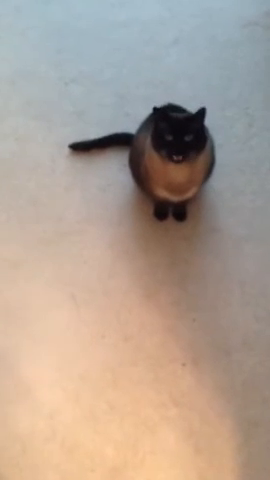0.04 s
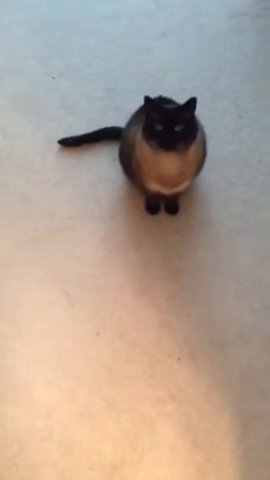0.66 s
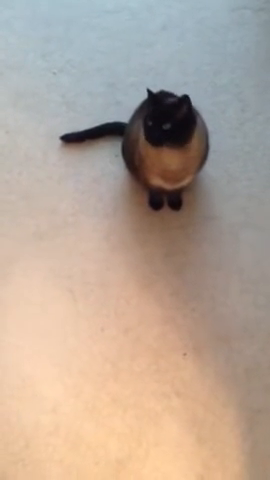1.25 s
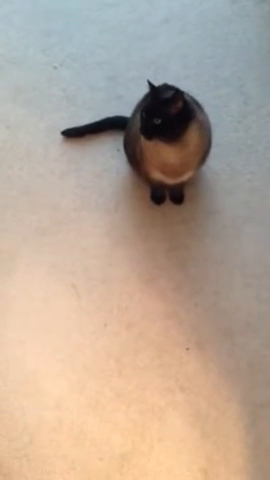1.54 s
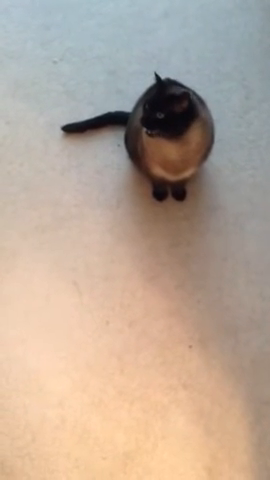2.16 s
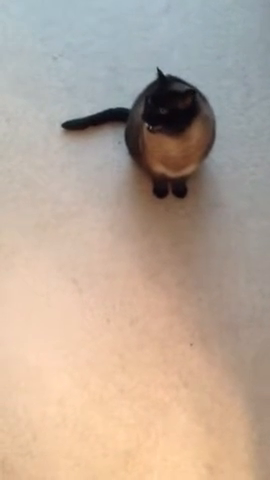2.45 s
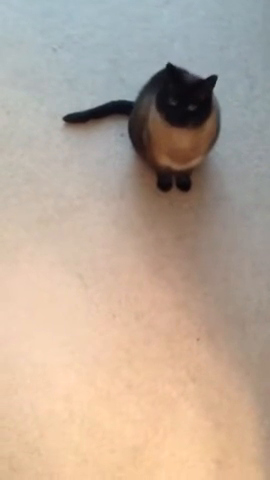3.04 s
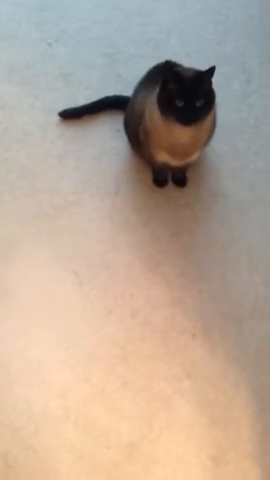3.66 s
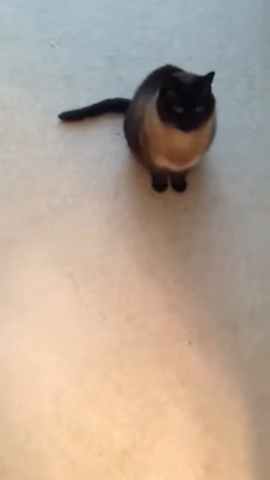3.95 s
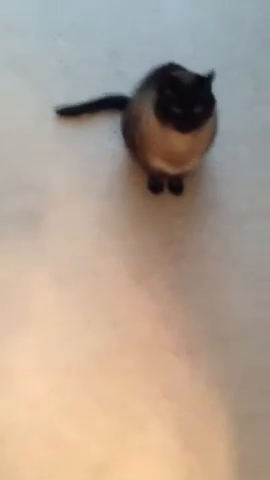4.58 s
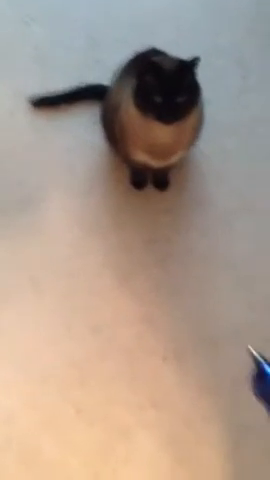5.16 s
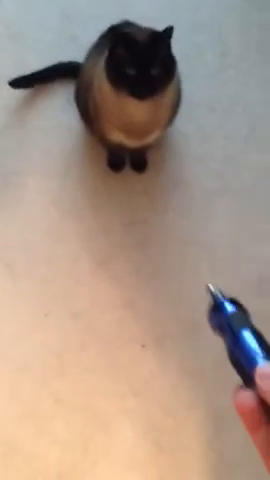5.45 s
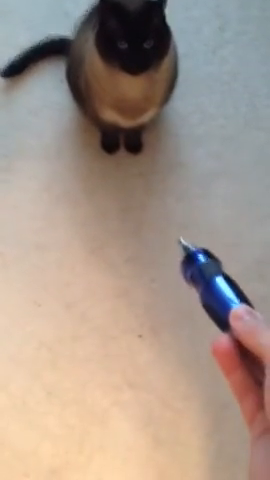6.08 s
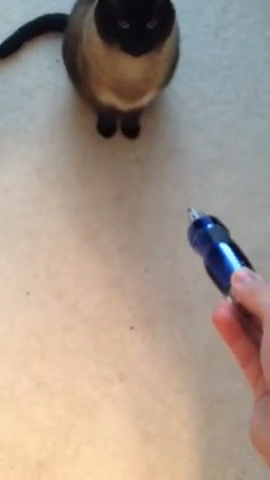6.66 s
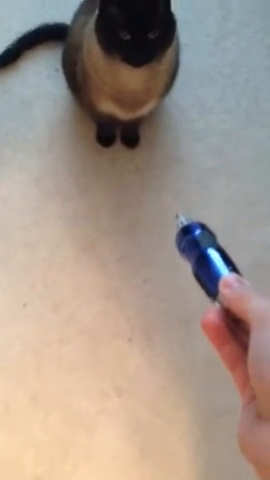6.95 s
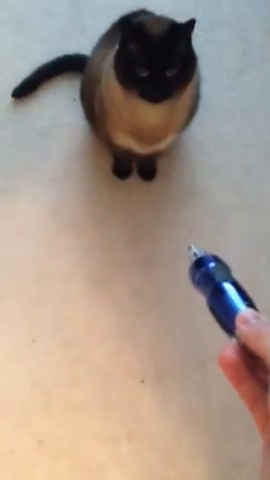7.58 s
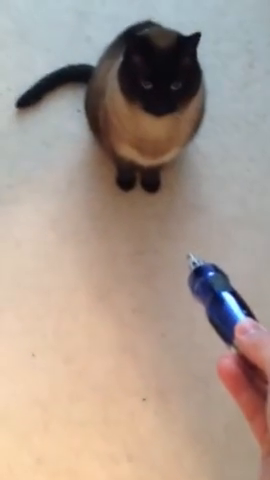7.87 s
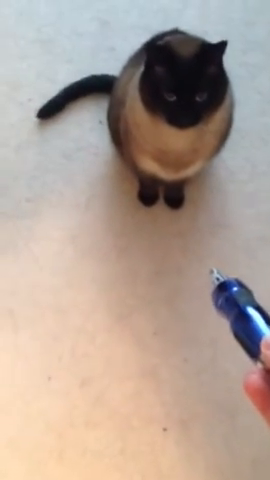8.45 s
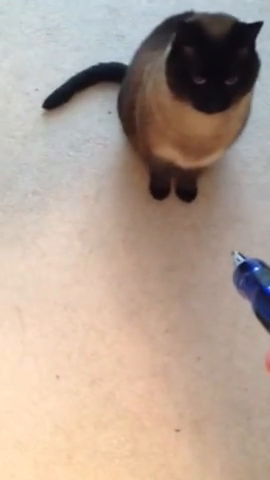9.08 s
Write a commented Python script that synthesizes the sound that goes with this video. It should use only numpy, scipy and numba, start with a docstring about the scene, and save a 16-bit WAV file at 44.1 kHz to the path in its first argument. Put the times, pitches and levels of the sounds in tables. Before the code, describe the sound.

The place is a quiet, carpeted room with very little echo and only a faint background rumble. Right at the start a cat meows for about a second: the call begins with a rasp, rises, clears and then sinks in pitch. After a short pause, a second meow runs from about 2.1 to 3.1 seconds, with a slight tremble and a falling end. At about 3.1 seconds a switch clicks and a small battery trimmer spins up quickly, closer and louder than the cat. It makes a high, hissing buzz with a fine, fast rattle and a thin motor whine, and almost no bass. A few faint, sharp taps come between 3.3 and 4.4 seconds. Its tone shifts as it is turned toward the microphone until about 5.6 seconds. The rattle then eases and it whirs steadily to the end, a little after 9 seconds.

```python
"""A quiet, carpeted room. A cat meows twice, its vocal folds the source and its mouth the filter: each
call starts with a rasp, clears, and sinks as the mouth closes. Then a small battery trimmer clicks on,
spins up and is brought round in front of the microphone. Its shaft scrapes and knocks alike on every
turn, a periodic force that rings the resonances of the plastic shell over the whine of the motor.
Faint rumble, hiss and mains hum lie beneath."""
import sys
import numpy as np
from scipy import signal
from scipy.fft import rfft, irfft, next_fast_len
from scipy.io import wavfile
from scipy.ndimage import uniform_filter1d, map_coordinates
from numba import njit

SR = 44100
rng = np.random.default_rng(int(sys.argv[2]) if len(sys.argv) > 2 else 0)


def digitize_waveform(pressure):
    """Quantize a signal to 16-bit integers and store it at the path in sys.argv[1].

    Rows of a 2-D input are taken as channels; values are limited to [-1, 1].
    """
    field = np.atleast_2d(pressure).T
    bounded = np.clip(field, -1, 1)
    quanta = np.round(bounded * 32767).astype(np.int16)
    wavfile.write(sys.argv[1], SR, quanta)


N = 411012
TIME = np.arange(N) / SR

# the cat's voice, one table a call: time_s, pitch_hz, mouth_resonance_hz
CALL_CONTOURS = [
    [(.09, 477, 846), (.135, 556, 1780), (.17, 572, 2020), (.195, 597, 2050), (.21, 706, 2090),
     (.23, 743, 2200), (.255, 781, 2080), (.34, 740.3, 1720), (.41, 718, 2040), (.46, 725.5, 2170),
     (.6, 676.5, 1370), (.672, 663, 1340), (.8, 624, 1300), (.92, 581, 1330), (1.02, 569.6, 1423),
     (1.084, 523, 1290), (1.125, 490, 1168), (1.21, 437, 1300)],
    [(2.09, 398, 820), (2.15, 415, 899), (2.21, 455, 987), (2.265, 526, 1630), (2.295, 694, 1640),
     (2.4, 689, 1830), (2.454, 676.5, 1950), (2.52, 652, 1856), (2.58, 613, 1330), (2.655, 647, 1265),
     (2.7, 636, 1255), (2.8, 611, 1320), (2.9, 568, 1225), (2.97, 537, 1087), (3.012, 460, 950),
     (3.09, 436, 810)],
]
# vocal effort, one table a call: time_s, level_db
CALL_EFFORT = [
    [(.09, -60.5), (.165, -49.5), (.22, -54), (.3, -54.5), (.35, -51.5), (.45, -48), (.54, -42.5),
     (.63, -52.5), (.78, -65.5), (1.1, -62.5), (1.15, -70.5), (1.22, -85)],
    [(2.09, -76), (2.2, -55), (2.27, -55), (2.34, -57), (2.44, -49), (2.55, -53), (2.68, -59),
     (2.87, -64.5), (3.03, -57), (3.08, -65)],
]
# two bands relative to the effort: time_into_call_s, fundamental_db, mid_resonance_db
CALL_BALANCE = [(0, -1, -17), (.09, -6.5, -4.5), (.14, -0.5, -9), (.24, -3.5, -42), (.37, -6, -23),
                (0.521, -3, -6), (.7, 4, -7), (.85, 7, -20), (0.969, 0.5, -22)]
# level of the voice's treble, one table a call: time_s, throat_db, edge_db
CALL_TREBLE = [
    [(0.1, -87, -88), (0.106, -65, -76), (0.154, -55.5, -77), (0.33, -82, -79), (0.498, -64, -56),
     (0.55, -80, -58), (0.566, -56, -52.5), (0.692, -75, -78), (0.85, -88, -87)],
    [(2.12, -91, -82), (2.174, -60.5, -69), (2.38, -61.5, -68), (2.474, -76, -64), (2.488, -83, -63),
     (2.57, -75, -72), (2.61, -80, -70), (2.78, -90, -75), (2.85, -90, -92)],
]
# upper resonances of the throat: centre_hz, width_hz, gain_db
THROAT_FORMANTS = [(3370, 600, 6), (3900, 1500, 0)]
# a thin treble edge that climbs as the mouth closes: time_s, centre_hz
EDGE_FORMANT = [(.1, 4670), (.35, 5050), (.44, 5680), (.55, 5640), (.7, 6200), (2.1, 5130), (2.35, 5525),
                (2.48, 5560), (2.56, 6300), (2.68, 6350), (2.76, 6680)]
# irregular vibration of the folds: start_s, end_s, roughness_fraction
RASPS = [(.07, .14, .6), (.14, .2, .33), (.2, .26, .22), (.268, .335, .85), (1.13, 1.22, 1),
         (2.07, 2.16, .5), (2.17, 2.255, .36), (2.27, 2.29, .6), (2.3, 2.37, .08), (2.45, 2.55, .07)]
# strong and weak cycles alternate after a rasp: start_s, end_s, depth_fraction
PERIOD_DOUBLINGS = [(.33, .41, .4), (2.29, 2.37, .2)]
# a harmonic crosses a null of the room: time_s, half_length_s, harmonic_number
ROOM_NULLS = [(.165, .03, 1), (.29, .022, 1), (.51, .008, 2), (.578, .006, 1), (.622, .008, 2),
              (.727, .006, 2), (.785, .012, 1), (.868, .014, 1), (1.09, .06, 1), (2.24, .035, 1),
              (2.59, .02, 1), (2.757, .012, 1), (2.817, .007, 1), (2.97, .085, 1)]
# a harmonic crosses a resonance: time_s, half_length_s, harmonic_number, level_over_effort_db
ROOM_PEAKS = [(0.177, 0.021, 4, 4.5), (0.216, 0.0061, 3, 12), (0.24, .009, 3, 10.5), (0.6, 0.012, 2, -5),
              (0.669, 0.01, 2, 11), (.7, 0.0081, 2, 7), (1.095, 0.0068, 2, 9.5), (2.23, 0.026, 2, 2),
              (2.267, .014, 3, 7.5), (2.349, 0.046, 5, -10), (2.476, 0.0094, 4, 2), (2.583, 0.028, 2, 16.5),
              (2.745, .03, 4, -5), (0.22, 0.014, 4, 1)]

# the motor's speed once spun up: time_s, turn_rate_hz
RUNNING_SPEED = [(3.8, 104.8), (4.21, 106.1), (4.29, 105.6), (4.44, 106.5), (4.5, 106.1), (4.78, 106.2),
                 (6.4, 106.4), (6.91, 105), (7.91, 106), (8.43, 104.7), (8.47, 105.6), (9.3, 105.2)]
# two stages of spin-up: initial_shortfall_hz, time_constant_s
SPIN_UP = [(26.05, .045), (15.547, .2)]
# the trimmer's loudness contour: time_s, level_db, relative_drone_db
TRIMMER_LEVEL = [(3.2, -40.5, -12), (3.5, -38.5, -17), (4.03, -41, -16.5), (4.32, -37.5, -16.5),
                 (4.44, -40, -15.5), (4.86, -41, -19), (6.24, -41.5, -17.5), (9.3, -41.5, -18)]
# how it is held: time_s, facing_fraction (0 from behind, 1 from the front), knock_over_hiss_db
GRIP = [(3.13, 0, -5.5), (3.45, 0.11, -7.5), (3.72, 0.47, -3.5), (4.32, 0.3, -4), (4.55, 0.42, -10.5),
        (4.7, 0.55, -6), (5.15, 0.76, -5.5), (5.6, 1, -5), (6.6, 0.98, -14), (9.3, 1, -15)]
# friction spectrum of the contacts: frequency_hz, gain_db
HISS_SPECTRUM = [(2500, -34.5), (4100, -13.5), (5200, -13), (6300, -5.5), (7500, -4), (9300, -1.5),
                 (11500, -1.5), (12700, -4), (13800, -6.5), (15300, -13.5)]
# high resonances of the shell: centre_hz, width_hz, behind_db, side_db, slant_db, front_db
SHELL_MODES = [(4380, 200, -15, -9, -12, -4.5), (4877, 310, -20, 1.5, -17, -12),
               (5550, 170, -14, 0.5, -3, -11.5), (5852, 190, -13, -14, -5.5, -4.5),
               (6130, 200, 0, -22, -20, -25), (7070, 530, 3.5, 3, 2, -23), (7750, 220, 11, 11.5, 3.5, -1.5),
               (8330, 350, -4, 1, 4, 0.5), (8930, 350, 6.5, -26, -43, -26), (12080, 360, -16, 4.5, 5, 0.5)]
# the band of hiss that a reflection cancels: time_s, centre_hz, depth_fraction
HISS_NOTCH = [(3.5, 10100, .05), (3.7, 9900, 0.7), (4.15, 9900, 0), (4.42, 9050, 0.3), (4.75, 10690, 0.9),
              (5.1, 10300, 0.2), (5.4, 10150, 0), (7.2, 9996, 0.27), (9.3, 10290, 0.2)]
# resonances rung by a knock: centre_hz, width_hz, gain_db
KNOCK_MODES = [(4820, 180, -2), (5614, 520, 0), (7540, 1560, 4)]
# broad vibration of the body: frequency_hz, gain_db
DRONE_SPECTRUM = [(500, -2), (1000, 2.5), (1250, -4.5), (1600, -1), (3900, -20), (5000, -57)]
# low resonances of the body: centre_hz, width_hz, behind_db, side_db, slant_db, front_db
BODY_MODES = [(1640, 200, 9.5, 0, -1, 5.8), (1970, 320, 6, -21, -0.5, 1.3), (2536, 290, 5, -1.5, 4.5, 5.9),
              (3140, 400, 0, -22, 3, 5.47), (3380, 186, 6, 3, -15, 3.96), (3760, 190, 4, 0, 2, 4.5)]
# motor tones on multiples of the turn rate: harmonic_number, level_db, waver_db
MOTOR_HARMONICS = [(6, -90, 1), (7, -86, 1), (8, -85, 1.5), (9, -72.5, 1), (10, -77.5, 1.5), (11, -85, 1.5),
                   (12, -85, 2), (18, -78, 2), (19, -78, 2), (20, -79, 2), (41, -69.5, 1), (42, -73, 1.5),
                   (43, -72, 1), (52, -71, 1.5), (53, -71, 1.5), (54, -67, 1.5)]
# gain of those tones as the trimmer is brought round: time_s, gain_db
WHINE_GAIN = [(3.2, -10), (3.7, -5), (4.1, 0), (5, 1.5), (6, 0), (9.3, -.5)]
# tones that the grip puts on a resonance: start_s, end_s, harmonic_number, level_db
RESONANT_TONES = [(3.22, 4.0, 18, -65), (3.7, 4.66, 46, -62.5), (3.9, 4.55, 16, -71), (4.15, 4.65, 73, -57),
                  (4.5, 4.62, 15, -59), (4.65, 5.55, 52, -62), (4.7, 5.3, 66, -59), (4.7, 5.4, 74, -60),
                  (5.3, 6.45, 16, -69), (7.1, 8.25, 16, -66), (7.55, 8.27, 18, -69)]
# harder blows of the tip: time_s, level_db, decay_s
TIP_TAPS = [(3.495, -40, 0.0046), (3.934, -37, 0.028), (4.242, -41, .005), (4.384, -44, .004),
            (3.287, -45, .002), (3.367, -42, 0.0018)]
# the snap of the switch: time_s, level_db
SWITCH_SNAPS = [(3.126, -39.5)]
# modes rung by the snap: frequency_hz, gain_db, t60_s
SWITCH_MODES = [(1970, -6, .04), (3070, 7.5, 0.016), (3420, 4, 0.02), (4100, -11, 0.034), (7300, -4, 0.025)]

# spectrum of the quiet room: frequency_hz, relative_density_db
AMBIENT_SPECTRUM = [(15, -42), (25, -22), (54, -1), (69, -2.5), (90, -6.5), (142, -9), (278, -12.5),
                    (475, -16), (604, -18.5), (709, -17.5), (1180, -23), (4040, -20), (15000, -22.5)]


def cat():
    """Source and filter: the tone of the folds passes the formants of mouth and throat into the room."""
    pitch_hz, mouth_hz = curves(np.vstack(CALL_CONTOURS))
    effort_db, = curves(np.vstack(CALL_EFFORT))
    rough = roughness()
    jitter = 1 + .0045 * walk(70) + .04 * rough * walk(300)
    phase = 2 * np.pi * np.cumsum(pitch_hz * jitter) / SR
    folds = vocal_folds(phase, rough)
    calling = sum(gate(call[0][0], call[-1][0], fade_s=.028) for call in CALL_EFFORT)
    loudness = undb(effort_db) * calling
    voice = loudness * mouth(folds, pitch_hz, mouth_hz, rough) + calling * throat(folds)
    heard = room(voice + throat_catch(), wet_db=-7, t60_s=.16)
    return standing_waves(heard, pitch_hz, phase, loudness)


def vocal_folds(phase, rough):
    """Self-sustained oscillation gives harmonics; rough folds add period doubling and turbulence."""
    harmonics = unit(sum(undb(2.8 * walk(45)) * np.cos(k * phase + k * k) for k in range(1, 14)))
    after_rasp = sum(depth * gate(start, end, fade_s=.02) for start, end, depth in PERIOD_DOUBLINGS)
    doubling = .9 * rough + after_rasp
    flutter = 1 + doubling * np.cos(phase / 2) + .45 * rough * walk(450)
    turbulence = (.035 + .45 * rough) * noise()
    return even(flutter * (harmonics + turbulence), samples=300)


def roughness(onset_s=.005, clearing_s=.022):
    """Chaotic vibration, 0 to 1: the voice breaks quickly and clears more slowly."""
    breaks = [
        rough * np.exp(np.minimum(TIME - start, 0) / onset_s - np.maximum(TIME - end, 0) / clearing_s)
        for start, end, rough in RASPS]
    return np.clip(.02 + np.max(breaks, axis=0), 0, 1)


def mouth(folds, pitch_hz, mouth_hz, rough, rasp_band_hz=820):
    """Cavity resonance: the closing mouth rings lower and more sharply, and a rasp blurs the peak."""
    fundamental_db, mid_db = call_balance()
    vowel = formant(folds, mouth_hz, width_hz=430 * (mouth_hz / 1300) ** 2 + 400 * rough)
    vowel = even(vowel + undb(.5) * formant(folds, hz=1115, width_hz=147))
    mid = np.sqrt(13) * formant(folds, hz=2530, width_hz=210)
    # in a rasp the fundamental gives way to a low band of its own
    low_hz = pitch_hz + (rasp_band_hz - pitch_hz) * np.minimum(2 * rough, 1)
    fundamental = even(formant(folds, low_hz, width_hz=180)) * undb(1.7 * walk(40))
    quaver = undb(2.2 * walk(75))
    voice = tremble() * (quaver * vowel + undb(mid_db) * mid) + undb(fundamental_db) * fundamental
    # a small mouth loses the fundamental when the pitch sinks
    return highpass(voice, hz=600, order=6)


def call_balance():
    """Spectral balance: the fundamental and mid resonance follow the same course in each call."""
    began_s = np.full(N, CALL_EFFORT[0][0][0])
    for call in CALL_EFFORT[1:]:
        began_s = np.where(TIME >= call[0][0], call[0][0], began_s)
    return curves(CALL_BALANCE, TIME - began_s)


def tremble(rate_hz=40, depth=.55):
    """Amplitude modulation: the throat flutters in the second call as the mouth starts to close."""
    beat = np.sin(2 * np.pi * np.cumsum(rate_hz * (1 + .25 * walk(30))) / SR)
    return 1 + depth * beat * gate(2.44, 2.84, fade_s=.041)


def throat(folds):
    """Upper formants: stationary throat resonances and a thin, climbing edge supply the treble."""
    throat_db, edge_db = curves(np.vstack(CALL_TREBLE))
    edge_hz, = curves(EDGE_FORMANT)
    ring = even(sum(undb(db) * formant(folds, hz, width) for hz, width, db in THROAT_FORMANTS))
    edge = even(formant(folds, edge_hz, width_hz=1100))
    return undb(throat_db - 4) * ring + undb(edge_db - 3) * edge


def throat_catch(at_s=2.414, half_length_s=.007):
    """A noise transient: the throat catches briefly in the second call."""
    crackle = unit(formant(noise(), hz=2170, width_hz=1600))
    return undb(-55) * crackle * np.exp(-((TIME - at_s) / half_length_s) ** 2)


def standing_waves(voice, pitch_hz, phase, loudness):
    """Interference: gliding harmonics drop out at the room's nulls and swell at its resonances."""
    def bump(at_s, half_s):
        return np.exp(-np.abs((TIME - at_s) / half_s) ** 3)

    for k in (1, 2):
        dip = np.minimum(sum(bump(s, half) for s, half, harmonic in ROOM_NULLS if harmonic == k), 1)
        voice = voice - .9 * dip * resonate(voice, k * pitch_hz, width_hz=np.full(N, 300.))
    swells = sum(undb(db) * bump(s, half) * np.sqrt(2) * np.cos(round(k) * phase)
                 for s, half, k, db in ROOM_PEAKS)
    return voice + loudness * swells


def trimmer():
    """Forced vibration: a turning shaft drives hiss, knock, drone and whine at its own period."""
    running_s = np.maximum(TIME - MOTOR_ON_S, 0)
    full_hz, = curves(RUNNING_SPEED)
    turn_hz = full_hz - sum(shortfall * np.exp(-running_s / lag) for shortfall, lag in SPIN_UP)
    level_db, drone_db = curves(TRIMMER_LEVEL)
    facing, knock_db = curves(GRIP)
    turns = np.cumsum(turn_hz * (1 + .001 * walk(25) + .0012 * walk(4))) / SR
    # play in the bearing shifts each contact a little, which blurs the highest multiples into hiss
    loose_turns = turns + .0013 * walk(200)
    # one strong contact a turn, and a lighter one half a turn later
    pulses = pulse_train(loose_turns, width_turns=.085, scatter_db=2.3)
    pulses += .35 * pulse_train(loose_turns + .5, width_turns=.07, scatter_db=4)
    hiss = contact_hiss(loose_turns, pulses, facing)
    contacts = even(hiss + undb(knock_db) * shaft_knock(loose_turns), samples=4000)
    drone = body_drone(turns, pulses, facing)
    # the drone is there at once; the hiss builds as the shaft gets going
    rise = 1 - np.exp(-running_s / HISS_RISE_S)
    body = undb(level_db) * (undb(.64) * rise * contacts + undb(drone_db + 1.84) * drone)
    # the tones grow steeply with speed
    whine = motor_whine(turns) * (turn_hz / turn_hz.max()) ** 8
    return (body + whine) * gate(MOTOR_ON_S, np.inf, fade_s=.013)


def contact_hiss(turns, pulses, facing, depth_behind=.35, depth_front=.8):
    """Pulsing friction excites the shell; a reflection cancels a band that slides as the hand moves."""
    pulse_depth = depth_behind + (depth_front - depth_behind) * facing
    rubbing = scrape(turns, fresh_db=-2) * (1 + pulse_depth * pulses)
    hiss = directivity(rubbing, facing, HISS_SPECTRUM, SHELL_MODES)
    notch_hz, notch_depth = curves(HISS_NOTCH)
    return hiss - notch_depth * resonate(hiss, notch_hz, width_hz=np.full(N, 1400.))


def shaft_knock(turns):
    """Impact excitation: one short blow a turn rings the shell."""
    blows = scrape(turns, fresh_db=-4) * pulse_train(turns, width_turns=.065, scatter_db=1.3)
    return even(sum(undb(db) * formant(blows, hz, width) for hz, width, db in KNOCK_MODES), samples=4000)


def body_drone(turns, pulses, facing, shift_db=2):
    """Structural resonance: friction drives the body's low modes, which come and go with the fingers."""
    rubbing = scrape(turns, fresh_db=1)
    shifts = sum((undb(shift_db * walk(2.5)) - 1) * formant(rubbing, hz, 1.5 * width)
                 for hz, width, *_ in BODY_MODES)
    drone = directivity((rubbing + shifts) * (1 + .3 * pulses), facing, DRONE_SPECTRUM, BODY_MODES)
    # so small a body radiates almost no low sound
    return highpass(drone, hz=1450, order=5)


def scrape(turns, fresh_db, points=416):
    """Periodic friction: the same bumps return each turn and slowly change, under fresh noise."""
    bumps = np.fft.ifft(np.exp(2j * np.pi * rng.random(points)))
    track = map_coordinates(bumps, [turns % 1 * points], order=3, mode="grid-wrap")
    repeating = np.real(track * np.exp(1j * walk(1.73)))
    return unit(unit(repeating) + undb(fresh_db) * noise())


def pulse_train(turns, width_turns, scatter_db):
    """Shimmer and jitter: one pulse a turn, each with its own strength and slightly early or late."""
    strength, lateness = rng.standard_normal((1024, 2))[turns.astype(int) % 1024].T
    offset_turns = turns % 1 - .5 - .015 * lateness
    return undb(scatter_db * strength) * np.exp(-.5 * (offset_turns / width_turns) ** 2)


def directivity(x, facing, spectrum, modes):
    """Directional radiation: different modes come forward as the trimmer turns to the microphone."""
    views = len(modes[0]) - 2
    heard = 0
    for view in range(views):
        share = np.maximum(1 - np.abs(facing * (views - 1) - view), 0)
        peaks = [(hz, width, db[view]) for hz, width, *db in modes]
        heard = heard + share * colour(x, spectrum, peaks)
    return even(heard, samples=4000)


def motor_whine(turns):
    """Harmonics of the turn rate waver; some sing out while the grip puts them on a resonance."""
    gain_db, = curves(WHINE_GAIN)
    phase = 2 * np.pi * turns
    tones = sum(undb(db + waver_db * walk(3)) * np.sin(k * phase) for k, db, waver_db in MOTOR_HARMONICS)
    singing = sum(undb(db + 2.3 * walk(35)) * gate(start, end, fade_s=.084) * np.cos(k * phase)
                  for start, end, k, db in RESONANT_TONES)
    return undb(gain_db + 1.5 * walk(30)) * tones + singing


def tip_taps():
    """Damped impacts: now and then the loose tip strikes harder and rings the shell."""
    blows = sum(undb(db) * np.exp(-np.abs(TIME - s) / decay) * (TIME > s) for s, db, decay in TIP_TAPS)
    return blows * unit(formant(noise(), hz=7400, width_hz=3400))


def switch(attack_s=.00042, crack_decay_s=.0086):
    """Free vibration: the switch snaps over with a crack and the plastic's modes ring down."""
    click = 0
    for at_s, level_db in SWITCH_SNAPS:
        age_s = np.maximum(TIME - at_s, 0)
        ring = sum(undb(db) * np.sin(2 * np.pi * hz * age_s) * np.exp(-np.log(1000) * age_s / t60)
                   for hz, db, t60 in SWITCH_MODES)
        crack = noise() * np.exp(-age_s / crack_decay_s) * (age_s > 0)
        attack = 1 - np.exp(-age_s / attack_s)
        click = click + undb(level_db) * attack * (.59 * ring + .48 * crack)
    return click


def room(x, wet_db, t60_s):
    """Reverberation: dense reflections follow the direct sound and die fast in a carpeted room."""
    t = TIME[:SR // 2]
    echo = rng.standard_normal(len(t)) * np.exp(-np.log(1000) * t / t60_s) * (t > .004)
    return x + undb(wet_db) * signal.fftconvolve(x, echo / np.linalg.norm(echo))[:N]


def ambience(mains_hz=59.5):
    """The noise floor: broadband rumble and hiss with a mains hum."""
    hum = unit(np.sin(2 * np.pi * mains_hz * TIME))
    return undb(-67) * unit(colour(noise(), AMBIENT_SPECTRUM)) + undb(-85) * hum


def formant(x, hz, width_hz):
    """Two equal resonators in cascade give a peak with steep skirts."""
    hz, width_hz = hz + np.zeros(N), width_hz + np.zeros(N)
    return resonate(resonate(x, hz, width_hz), hz, width_hz)


@njit
def resonate(x, hz, width_hz):
    """A damped resonator: a state-variable band-pass whose centre and width move."""
    y, band_state, low_state = np.empty(len(x)), 0., 0.
    for i in range(len(x)):
        tuning, damping = np.tan(np.pi * hz[i] / SR), width_hz[i] / hz[i]
        band = (band_state + tuning * (x[i] - low_state)) / (1 + tuning * (tuning + damping))
        band_state = 2 * band - band_state
        low_state += 2 * tuning * band
        y[i] = damping * band
    return y


def colour(x, spectrum, peaks=()):
    """Spectral shaping: resonance peaks add in power to a broad spectrum."""
    hz, db = np.transpose(spectrum)
    size = next_fast_len(N + 4096)
    bin_hz = np.maximum(np.fft.rfftfreq(size, 1 / SR), 1)
    power = undb(np.interp(np.log(bin_hz), np.log(hz), db)) ** 2
    for centre, width, peak_db in peaks:
        power += (undb(peak_db) / (1 + 2 * ((bin_hz - centre) / width) ** 2)) ** 2
    return irfft(rfft(x, size) * np.sqrt(power), size)[:N]


def highpass(x, hz, order):
    """Attenuation below a cutoff frequency."""
    return signal.sosfilt(signal.butter(order, hz, "highpass", fs=SR, output="sos"), x)


def undb(db):
    """Decibels to amplitude ratio."""
    return 10 ** (np.asarray(db) / 20)


def unit(x):
    """Normalisation to rms 1."""
    return x / np.sqrt(np.mean(x ** 2))


def even(x, samples=1100):
    """Normalisation of the short-term rms to 1."""
    return x / np.sqrt(np.abs(uniform_filter1d(x ** 2, samples)) + 1e-12)


def curves(table, time_s=TIME):
    """Linear interpolation of a table's columns in time."""
    knots_s, *columns = np.transpose(table)
    return [np.interp(time_s, knots_s, column) for column in columns]


def gate(start_s, end_s, fade_s):
    """A trapezoidal envelope of height 1."""
    return np.clip(np.minimum(TIME - start_s, end_s - TIME) / fade_s, 0, 1)


def noise():
    """White noise."""
    return rng.standard_normal(N)


def walk(rate_hz):
    """Smoothed noise of rms 1 that changes about rate_hz times a second."""
    size = max(int(SR / rate_hz), 2)
    return unit(uniform_filter1d(uniform_filter1d(noise(), size), size))


def scene():
    """Superposition in one room: the trimmer, nearer than the cat, has less reverberation."""
    tool = room(trimmer() + tip_taps() + switch(), wet_db=-13, t60_s=.2)
    return (cat() + tool + ambience())[None]


def record(dry, cutoff_hz=15200):
    """Band limiting: a steep low-pass removes the highest treble."""
    return signal.sosfilt(signal.ellip(10, .2, 70, cutoff_hz, fs=SR, output="sos"), dry)


MOTOR_ON_S, HISS_RISE_S = 3.13, .023

dry = scene()
out = record(dry)
digitize_waveform(out)
```